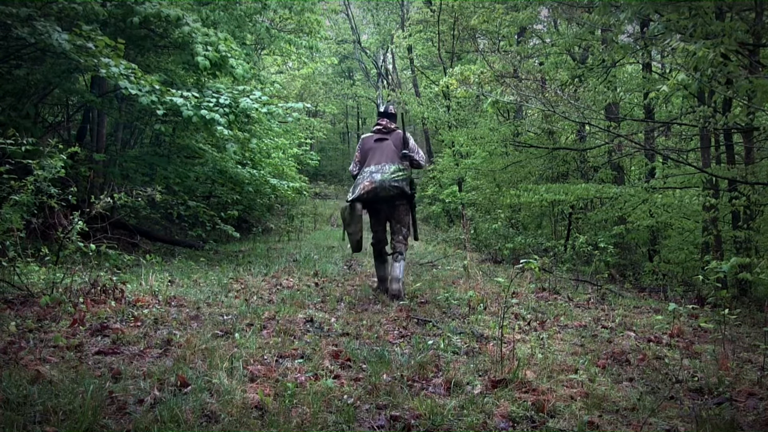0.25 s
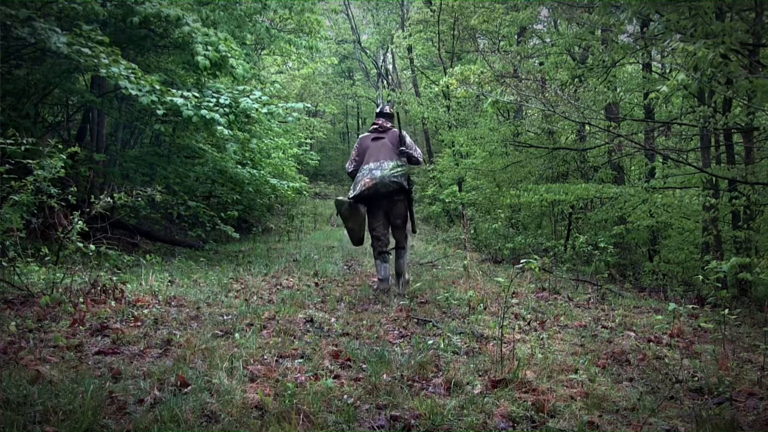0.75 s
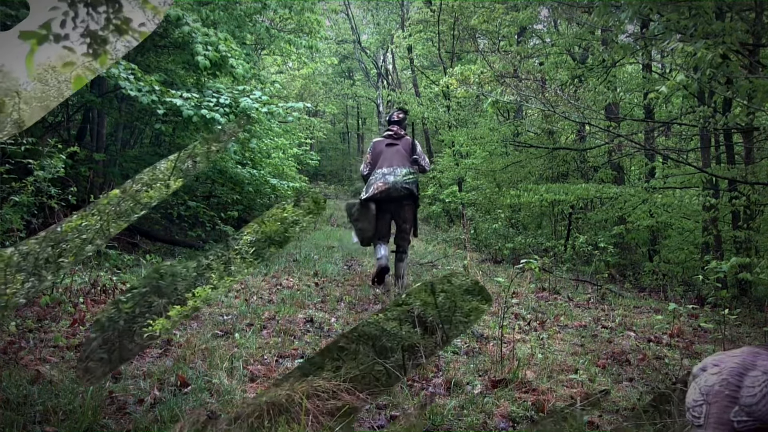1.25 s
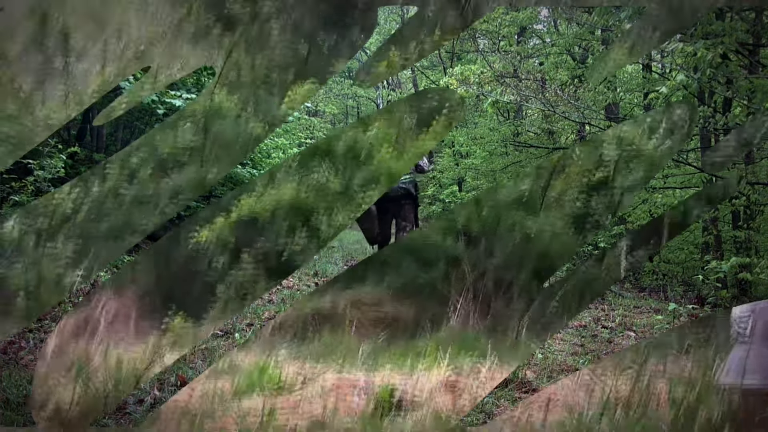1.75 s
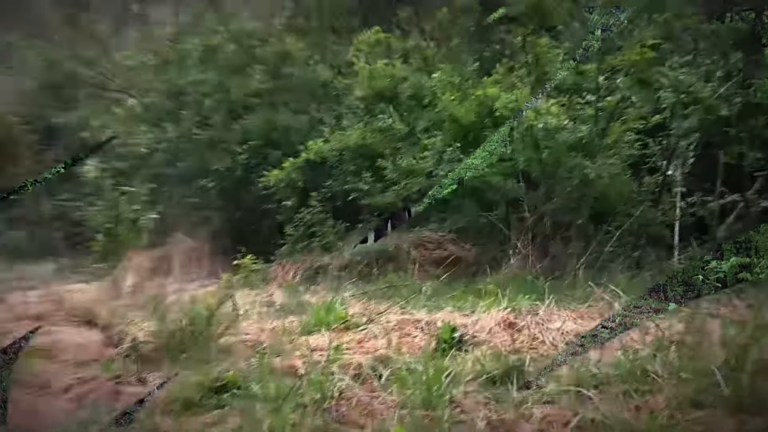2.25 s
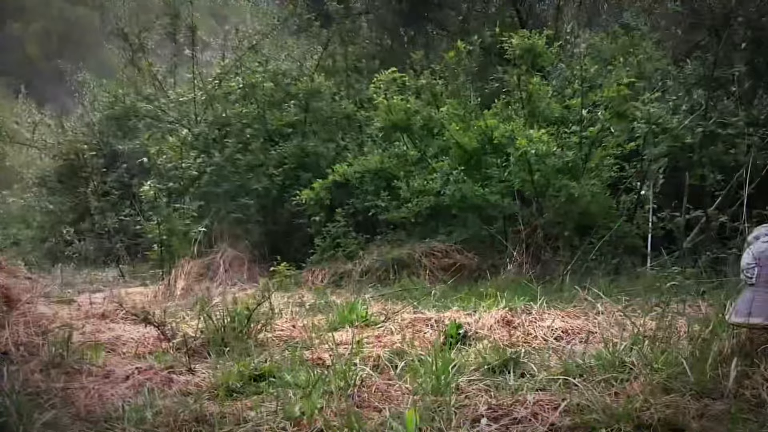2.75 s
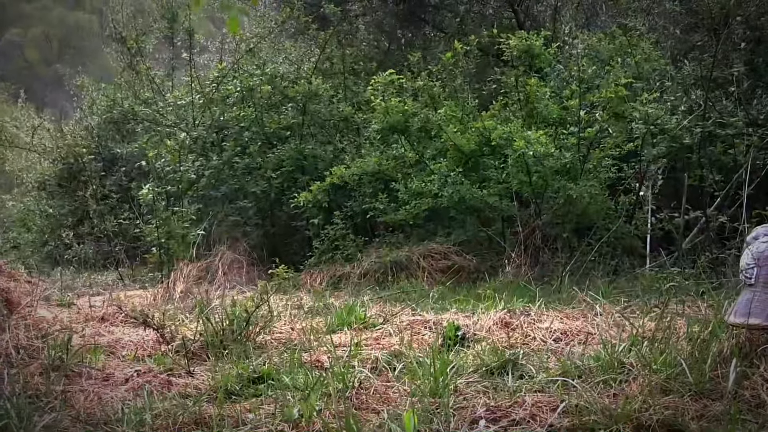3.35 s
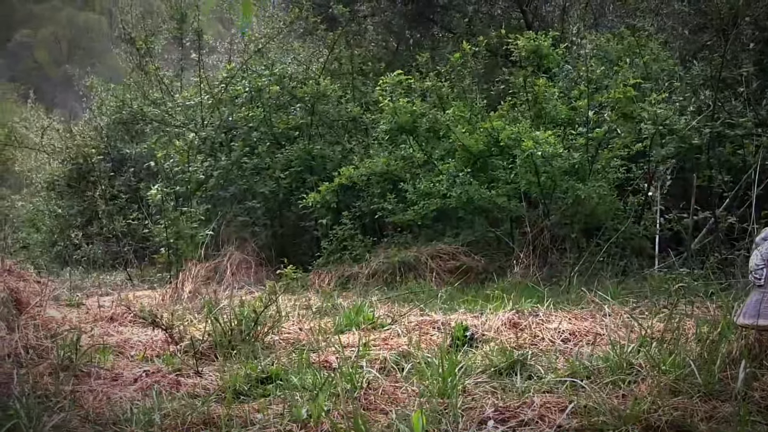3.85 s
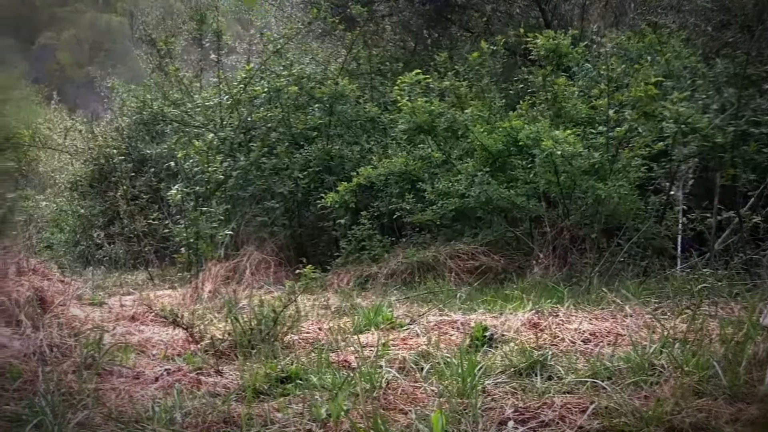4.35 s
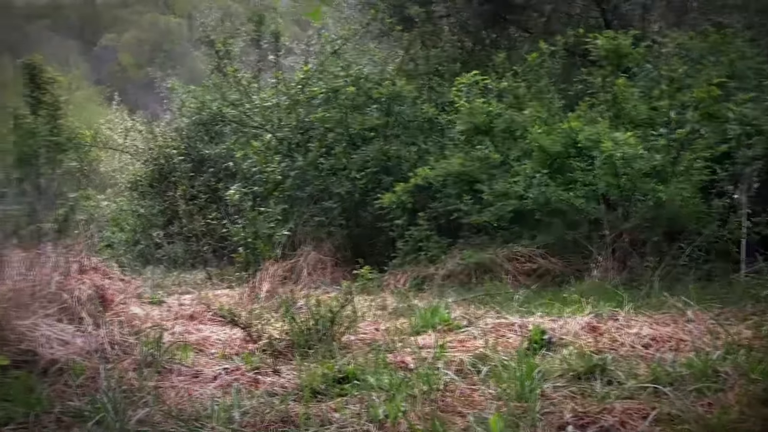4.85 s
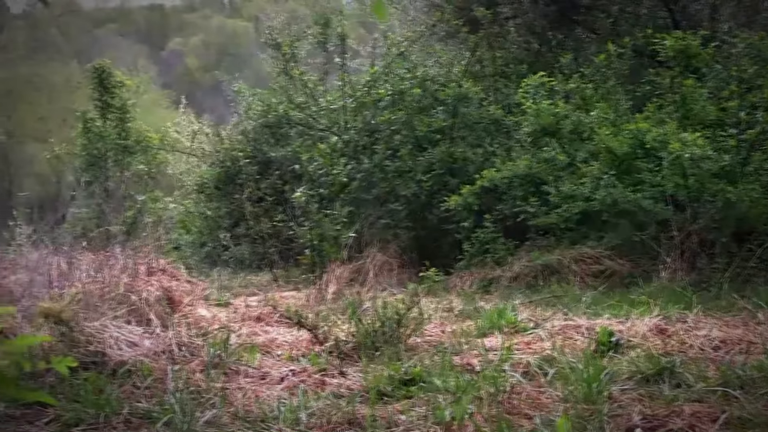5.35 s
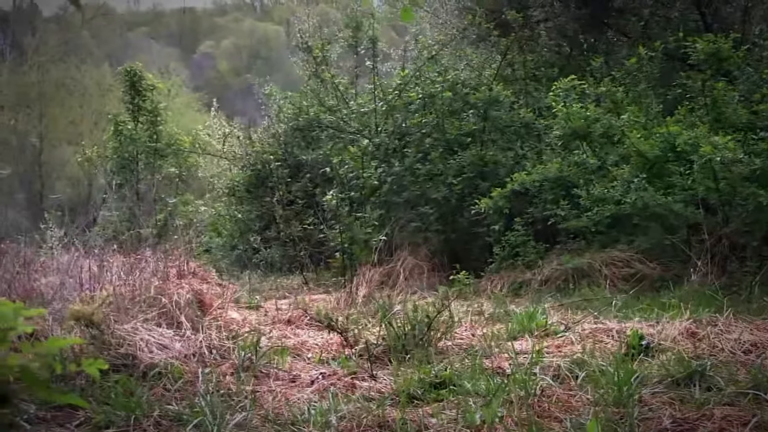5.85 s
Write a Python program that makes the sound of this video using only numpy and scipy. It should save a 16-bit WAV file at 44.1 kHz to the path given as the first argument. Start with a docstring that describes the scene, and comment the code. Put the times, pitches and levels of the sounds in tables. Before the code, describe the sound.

Faint songbirds and a few soft steps in a wood, then a distant turkey yelps and a close one calls loudly with raspy notes.

```python
"""Spring woodland, one microphone. Songbirds whistle among the trees; one trills, then a two-note song repeats.
A few soft knocks of steps and gear sound over the hush of the wood. Near three seconds a wild turkey hen
yelps softly from farther off. From 3.5 s another yelps close to the microphone, and the far one answers:
each full note leaps up, rings clear, then sags and breaks into a rasp as the two membranes of the syrinx
part in pitch and beat against each other."""
import sys
import numpy as np
from scipy import signal
from scipy.fft import rfft, irfft, next_fast_len
from scipy.io import wavfile
from scipy.ndimage import uniform_filter1d, map_coordinates

SR = 44100
rng = np.random.default_rng(int(sys.argv[2]) if len(sys.argv) > 2 else 0)


def to_wav(s):
    """Save 16-bit WAV."""
    ch = np.atleast_2d(s).T  # columns
    pcm = np.round(np.clip(ch, -1, 1) * 32767)  # PCM
    wavfile.write(sys.argv[1], SR, pcm.astype(np.int16))


N = 269010
TIME = np.arange(N) / SR

ONSET_RASP, ONSET_RASP_S, FULL_RASP = .72, .013, .82   # a note starts rough and breaks rougher still
SWELL_DB, SWELL_S, RASP_LOSS_DB, CLOSE_DB = 7.5, .021, 3, 2.5
EFFORT_PEAK_S, EFFORT_DB_PER_S = .072, 25   # her effort builds to a peak, then ebbs
THROB_HZ, THROB_PEAK_S = 16.25, .033
# the near hen's clear voice: harmonic number, level/dB
NEAR_HARMONICS = [(1, -40), (2, -19), (3, -12.5), (4, -0.5), (5, -23), (6, -14), (7, -24.5), (8, -26),
                  (9, -28.5), (10, -29.5), (11, -43.5), (13, -43.5), (16, -62)]
# her yelps: start t/s, end t/s, pitch f/Hz, leap f/Hz, sag f/Hz, bow of the sag (1 = straight),
# level/dB, throb/dB, early rasp (0-1), breaks after t/s, break takes t/s
NEAR_YELPS = [(3.511, 3.562, 853, 0, 22.3, 0.88, -16.5, 0, 0.66, 0, 0.04),
              (3.802, 4.069, 937.8, 199.5, 104.1, 1.1, -16.5, 0, 0.14, 0.096, 0.17),
              (5.408, 5.663, 942.7, 196.5, 88.16, 1.55, -13, 1, 0.033, 0.17, .035),
              (5.908, 6.179, 939.2, 204, 100, 0.88, -14, 1.9, 0.0028, 0.17, 0.081)]


def near_hen():
    """Close to the microphone: loud yelps that swell, throb and break, with a faint tail from the wood."""
    dry = np.zeros(N)
    for start, end, hz, leap_hz, sag_hz, bow, db, throb_db, early_rasp, break_at, break_s in NEAR_YELPS:
        length = end - start
        age = ages(length + .043)
        pitch, closing = yelp_pitch(age, length, hz, leap_hz, sag_hz, bow, leap_s=.0105)
        broken = np.clip((age - break_at) / break_s, 0, 1)
        onset_rasp = ONSET_RASP * np.exp(-(age / ONSET_RASP_S) ** 2)
        rasp = np.maximum(early_rasp + (FULL_RASP - early_rasp) * broken, onset_rasp)
        ebb = EFFORT_DB_PER_S * np.abs(age - EFFORT_PEAK_S)
        soft_start = SWELL_DB * np.exp(-age / SWELL_S) * (1 - early_rasp)   # a rough note starts louder
        throb = throb_db * np.cos(2 * np.pi * THROB_HZ * (age - THROB_PEAK_S))
        level_db = db - ebb - soft_start + throb - RASP_LOSS_DB * broken - CLOSE_DB * closing ** 2
        note = yelp(pitch, level_db, rasp, length, NEAR_HARMONICS,
                    jitter=.018, beat_depth=.27, second_db=-22.5, shimmer_db=3.6)
        dry += placed(note, start)
    dry = band(dry, 470, 13400)
    return dry + from_db(-15) * trees(dry, t60=.58, top_hz=6600, first_s=.002)


def yelp_pitch(age, length, hz, leap_hz, sag_hz, bow, leap_s, close_s=.01757, drop_hz=52.6):
    """Pitch leaps up, sags and drops at the close. Also gives how far the note has closed, 0-1."""
    leap = leap_hz * np.exp(-age / leap_s)
    sag = sag_hz * (age / length) ** bow
    closing = np.exp(np.minimum(age - length, 0) / close_s)
    return hz - leap - sag - drop_hz * closing, closing


SECOND_MEMBRANE_HZ = 932   # holds its pitch while the first membrane sags
RASP_DULL_DB, HIGHEST_FIRM_HARMONIC = 1.7, 6   # rasp dissolves the harmonics above this one
# a hen's throat when the voice rasps: f/Hz, level/dB
THROAT = [(850, -32.5), (1300, -17.5), (1650, -7.5), (2100, -21.5), (2600, -10.5), (3400, 1), (4300, -3.5),
          (5100, -6), (6100, -11), (7000, -12.5), (9000, -25), (12000, -30.5), (15000, -37)]


def yelp(pitch, level_db, rasp, length, voice, jitter, beat_depth, second_db, shimmer_db, grit_db=-6):
    """One note: two membranes of the syrinx part in pitch and beat ever faster into a rasp."""
    size, rasp = len(pitch), np.clip(rasp, 0, 1)
    wobble = .0025 * drift(81, size) + jitter * rasp ** 2 * drift(900, size)
    phase = 2 * np.pi * np.cumsum(pitch * (1 + wobble)) / SR
    second_phase = 2 * np.pi * np.cumsum(SECOND_MEMBRANE_HZ * (1 + .014 * drift(137.2, size))) / SR
    beat = second_phase - phase
    tone = from_db(second_db) * rasp * (np.sin(second_phase) + np.sin(2 * second_phase))
    for k in range(1, 17):
        # rasping shifts energy from the fourth harmonic into the broad throat resonance
        strength = (1 - rasp) * from_db(along(voice, k)) + rasp * at_hz(THROAT, k * pitch)
        shimmer = from_db(shimmer_db * min(k / 5, 1.5) * drift(57.5, size))
        dull = from_db(-RASP_DULL_DB * np.sqrt(rasp) * max(k - HIGHEST_FIRM_HARMONIC, 0))
        tone += dull * strength * shimmer * np.sin(k * phase + .385 * k * k)
        for step in (-2, -1, 1, 2, 3):   # the beat hangs side tones on each harmonic, mostly above it
            side_hz = k * pitch + step * (SECOND_MEMBRANE_HZ - pitch)
            side = beat_depth * rasp ** .59 * at_hz(THROAT, side_hz) * min(k / 4, 1)
            side *= dull * (1 if step > 0 else .45)
            tone += side * np.sin(k * phase + step * beat + rng.uniform(0, 2 * np.pi))
    tone /= np.sqrt(uniform_filter1d(tone ** 2, size=900) + 1e-9)   # even out the level
    pulsed_noise = rng.standard_normal(size) * (1 + np.cos(phase)) * (1 + .49 * np.cos(2 * beat))
    grit = coloured(pulsed_noise, THROAT)
    share = from_db(grit_db) * (rasp + .03)
    envelope = from_db(level_db) * gate(np.arange(size) / SR, length, rise_s=.00089, fall_s=.0076)
    return envelope * (tone + share * grit) / np.sqrt(1 + share ** 2)


FAR_SWELL_DB_PER_HZ, FAR_FADE_DB = .18, 8   # a wider leap starts softer; each note fades as it goes
# the far hen's clear voice: harmonic number, level/dB
FAR_HARMONICS = [(1, -13), (2, -2), (3, 1.5), (4, 16.5), (5, -41.5), (6, 1), (7, -13.5), (9, -17),
                 (11, -38), (16, -67)]
# colour lent by ground and foliage on the way to the microphone: f/Hz, gain/dB
FOLIAGE_PATH = [(700, -34), (1700, 10), (2600, 8), (3500, -2.5), (4400, -8), (5200, -4), (8000, 3),
                (14000, -10)]
# her yelps: start t/s, end t/s, pitch f/Hz, leap f/Hz, sag f/Hz, level/dB before the path,
# rasp (0-1), extra ring of the fourth harmonic/dB
FAR_YELPS = [(2.851, 2.963, 929, 68, 21.9, -45.5, 0.08, -15),
             (3.097, 3.514, 891.6, 141, 95, -38, 0.43, 3.5), (4.059, 4.158, 807, -1, 35, -36.5, 0.53, 1.5),
             (4.163, 4.332, 792, 30.5, 58, -37.5, 0.67, -0.5),
             (5.761, 6.023, 840, 16.5, 32.6, -36.5, 0.15, 6.5)]


def far_hen():
    """Farther off in the wood: soft yelps, coloured and smeared by the trees."""
    dry = np.zeros(N)
    for start, end, hz, leap_hz, sag_hz, db, rasp, ring_db in FAR_YELPS:
        length = end - start
        age = ages(length + .03)
        pitch, _ = yelp_pitch(age, length, hz, leap_hz, sag_hz, bow=1.1, leap_s=.02)
        soft_start = FAR_SWELL_DB_PER_HZ * leap_hz * np.exp(-age / .025)
        level_db = db - soft_start - FAR_FADE_DB * age / length
        voice = [(k, harmonic_db + ring_db * (k == 4)) for k, harmonic_db in FAR_HARMONICS]
        note = yelp(pitch, level_db, rasp, length, voice,
                    jitter=.011, beat_depth=1, second_db=-14, shimmer_db=3.5)
        dry += placed(note, start)
    size = next_fast_len(N)
    path = at_hz(FOLIAGE_PATH, np.arange(size // 2 + 1) * SR / size)
    arriving = irfft(rfft(dry, size) * path, size)[:N]
    return from_db(-2) * arriving + from_db(-1) * trees(arriving, t60=1, top_hz=6100, first_s=.004)


TRILL_START_S, TRILL_STEP_S, TRILL_SLOWING_S = .573, .0719, .00013
TRILL_DB, TRILL_PEAK_S, TRILL_FADE_DB_PER_S2 = -29.7, .78, 50
ARCH_S, ARCH_FOOT_HZ, ARCH_TOP_HZ, ARCH_FOOT_DB = .0165, 3120, 5674, -11
SWEEP_AFTER_S, SWEEP_S, SWEEP_FROM_HZ, SWEEP_TO_HZ = .023, .045, 5400, 8000
SWEEP_DB, SWEEP_FADE_DB = -4, 29


def trill(count=9):
    """A songbird in the trees repeats a quick arch and a fading upsweep, slowing slightly."""
    height = np.sin(np.pi * (ages(ARCH_S) / ARCH_S) ** 1.5) ** .68
    arch_hz = ARCH_FOOT_HZ + (ARCH_TOP_HZ - ARCH_FOOT_HZ) * height
    arch_gain = from_db(ARCH_FOOT_DB * (1 - height)) * signal.windows.tukey(len(height), .15)
    progress = ages(SWEEP_S) / SWEEP_S
    sweep_hz = SWEEP_FROM_HZ + (SWEEP_TO_HZ - SWEEP_FROM_HZ) * progress ** .5
    sweep_gain = from_db(SWEEP_DB - SWEEP_FADE_DB * progress) * np.minimum(20 * progress, 1)
    dry = np.zeros(N)
    for k in range(count):
        start = TRILL_START_S + k * TRILL_STEP_S + k * k * TRILL_SLOWING_S
        tuning = rng.normal(1, .0075)
        arch = placed(arch_gain * sine(tuning * arch_hz), start)
        sweep = placed(sweep_gain * sine(tuning * sweep_hz), start + SWEEP_AFTER_S)
        dry += from_db(TRILL_DB - TRILL_FADE_DB_PER_S2 * (start - TRILL_PEAK_S) ** 2) * (arch + sweep)
    return dry + from_db(-3.5) * trees(dry, t60=.56, top_hz=8000, first_s=.002)


# held whistles: start t/s, length t/s, f/Hz, level/dB
HELD_NOTES = [(-.05, 0.117, 2605, -36), (.112, 0.21, 6540, -54), (.215, 0.23, 2540, -39),
              (0.393, 0.24, 3745, -42.5), (2.453, 0.09, 3340, -52), (2.919, 0.067, 2644, -48),
              (3.773, 0.074, 3350, -35)]
# the long note of a two-note song: start t/s, length t/s, f/Hz, level/dB
SONG_NOTES = [(1.519, .11, 2710, -36.5), (1.74, .13, 2656, -32.5), (1.983, .135, 2655, -32)]
# falling slurs: start t/s, length t/s, first f/Hz, level/dB, share scattered by the trees (0-1)
FALLING_SLURS = [(0.786, 0.12, 3120, -41, 0.78), (1.13, 0.14, 3073, -42, 0.75),
                 (2.829, 0.071, 3130, -47.5, 0.4), (4.306, 0.032, 3760, -40.5, 0.4),
                 (4.596, 0.024, 3795, -40, 0.7), (4.859, .1, 3210, -47.5, .55),
                 (4.964, .04, 3220, -42, 0.9), (5.307, 0.057, 3120, -45, 0.8)]
# rising slurs: start t/s, length t/s, first f/Hz, level/dB
RISING_SLURS = [(0.174, 0.096, 1825, -44), (2.349, 0.11, 2770, -52.5), (2.986, .095, 2610, -48),
                (3.658, 0.065, 2780, -42), (4.481, 0.065, 2570, -45.5), (4.896, 0.021, 5500, -49)]


def songbirds():
    """Gliding whistles from around the wood; the farther the bird, the more the trees scatter it."""
    song = np.zeros((2, N))
    for start, length, hz, db in HELD_NOTES:
        song += whistle(start, length, hz, hz * (1 - .01523), db, bow=.81, wet=.6)
    for start, length, hz, db in SONG_NOTES:
        song += whistle(start, length, hz, hz * (1 - .036), db, bow=.446, wet=.33)
        flick_at = start + length + .027   # the second note is an upward flick
        song += whistle(flick_at, length=.024, from_hz=2330, to_hz=2753, db=db - 5, bow=.45, wet=.51)
    for start, length, hz, db, wet in FALLING_SLURS:
        song += whistle(start, length, hz, hz * .72, db, bow=3.1, wet=wet)
    for start, length, hz, db in RISING_SLURS:
        song += whistle(start, length, hz, hz * 1.4, db, bow=.77, wet=.62)
    for start in 3.58 + .2815 * np.arange(5):   # a nearer bird repeats one low falling chirp
        song += whistle(start, length=.064, from_hz=2490, to_hz=1856, db=-43, bow=2.3, wet=.18)
    direct, scattered = song
    return direct + trees(scattered, t60=.91, top_hz=5960, first_s=.0029)


def whistle(start, length, from_hz, to_hz, db, bow, wet):
    """A pure note, as a direct part and a part to scatter; a bow under 1 glides early, over 1 late."""
    progress = ages(length) / length
    hz = (from_hz + (to_hz - from_hz) * progress ** bow) * (1 + .0048 * drift(87, len(progress)))
    swell = np.sqrt(np.minimum(2 * progress, 1)) * np.minimum(10 * (1 - progress), 1)   # quick stop
    note = from_db(db + 1.3 * drift(71, len(progress))) * swell * sine(hz)
    return np.outer([np.sqrt(1 - wet ** 2), wet], placed(note, start))


# soft knocks: t/s, level/dB, ring f/Hz, ring's 60 dB decay t/s, relative crack level/dB
STEPS_AND_GEAR = [(1.662, -42, 1780, .021, -2), (1.912, -33, 550, .072, -14), (2.145, -27, 695, .042, -24),
                  (2.257, -28.5, 1100, .016, -24), (2.721, -30.5, 200, .05, -14),
                  (2.737, -27.5, 1064, .022, -5), (3.094, -33, 1100, .03, -14)]


def knocks():
    """Steps and gear: each a damped ring with a longer, dull thud under it and a brief crack on top."""
    out = np.zeros(N)
    for start, db, hz, t60, crack_db in STEPS_AND_GEAR:
        at = span(start, start + .2)
        t = np.arange(len(at)) / SR
        thud_noise, crack_noise = rng.standard_normal((2, len(at)))
        ring = .47 * np.sin(2 * np.pi * hz * t) * from_db(-60 * t / t60)
        thud = .35 * rms_one(band(thud_noise, hz / 5, hz * 1.63)) * from_db(-30 * t / t60)
        crack = from_db(crack_db - 3.5 - 60 * t / .016) * rms_one(band(crack_noise, 1150, 5100, order=1))
        out[at] += from_db(db) * (ring + thud + crack)
    return band(out, 117, 15000, order=3)


def buzz():
    """The buzzy close of a distant bird's song dies away in the first moments."""
    return from_db(-46.5 - 89 * TIME) * rms_one(band(rng.standard_normal(N), 3770, 4310))


# dry leaves stirring: start t/s, length t/s, level/dB
LEAF_STIRS = [(2.301, 0.055, -58), (3.2, 0.024, -55), (4.642, 0.063, -50)]


def rustles():
    """Dry leaves give short clumps of tiny snaps."""
    out = np.zeros(N)
    for start, length, db in LEAF_STIRS:
        at = span(start, start + length)
        snaps = rng.standard_normal(len(at)) * from_db(4.7 * drift(403, len(at)))
        out[at] += from_db(db) * rms_one(band(snaps, 1500, 3900, order=1) * np.hanning(len(at)))
    return out


# colour of the wood's background: f/Hz, spectral level/dB
WOOD_SPECTRUM = [(18, -55), (30, -37), (133, -7.5), (164, -3), (237, -4.5), (420, -1), (575, -1), (945, -2),
                 (1140, -5.5), (2420, -6.5), (2620, 0.5), (3150, -6.5), (4310, -16), (7260, -26.5),
                 (15500, -35.5)]
# hush of moving air: t/s, level/dB
HUSH_CURVE = [(0, -54), (1.2, -54.5), (1.7, -52.5), (2.4, -52.5), (3.0, -52.5), (3.7, -50), (4.6, -48.5),
              (6.1, -50.5)]
# hiss of leaves and air: t/s, level/dB
HISS_CURVE = [(0, -59.5), (2.22, -58), (2.28, -62.5), (2.7, -60), (3.2, -58), (4.5, -55.5), (6.1, -56)]
# blur of distant song: t/s, level/dB
CHORUS_CURVE = [(0, -61.5), (1.4, -58), (2.2, -62.5), (2.5, -57.5), (3.5, -49), (4.6, -56), (5.2, -56.5),
                (6.1, -46.5)]


def woodland():
    """All around the microphone: rumble and hush of moving air, thin leaf hiss and distant song."""
    rumble = from_db(-64 + drift(33, N)) * rms_one(band(rng.standard_normal(N), 99, 264))
    hush = np.zeros(N)
    for hz in np.geomspace(130, 1900, 9):   # each band wavers on its own
        noise = band(rng.standard_normal(N), hz / 1.168, hz * 1.2)
        hush += noise * at_hz(WOOD_SPECTRUM, hz) * from_db(1.85 * drift(21, N))
    hush = rms_one(hush) * from_db(along(HUSH_CURVE, TIME))
    air = coloured(rng.standard_normal(next_fast_len(N)), WOOD_SPECTRUM)[:N]
    hiss = rms_one(band(air, 5120, 18700, order=3)) * from_db(along(HISS_CURVE, TIME) + .5 * drift(33, N))
    chorus = np.zeros(N)
    for hz in np.geomspace(2100, 4000, 8):   # the distant voices come and go
        noise = band(rng.standard_normal(N), hz * .95, hz * 1.05)
        chorus += noise * at_hz(WOOD_SPECTRUM, hz) * from_db(4.5 * drift(25, N))
    return rumble + hush + hiss + rms_one(chorus) * from_db(along(CHORUS_CURVE, TIME))


def trees(x, t60, top_hz, first_s):
    """Trunks and leaves throw back a thickening swarm of small, duller echoes."""
    t = ages(1)
    swarm = rng.standard_normal(SR) * (rng.random(SR) < .02 + t) * (t > first_s)
    decay = from_db(-60 * t / t60) / np.sqrt(.0042 + t)
    echoes = band(swarm * decay, 280, top_hz, order=1)
    return signal.fftconvolve(x, echoes / np.sqrt(np.sum(echoes ** 2) * SR / 2 / top_hz))[:N]


def from_db(db):
    """Decibels to gain."""
    return 10 ** (np.asarray(db) / 20)


def rms_one(x):
    """Scale to unit rms."""
    return x / np.sqrt(np.mean(x ** 2) + 1e-20)


def along(curve, x):
    """A two-column curve, read at x."""
    return np.interp(x, *np.transpose(curve))


def at_hz(spectrum, hz):
    """Gain of a spectrum at the given frequencies."""
    f, db = np.transpose(spectrum)
    return from_db(np.interp(np.log(hz + 1), np.log(f), db))


def coloured(x, spectrum):
    """Pass a sound through a spectrum; rms 1."""
    hz = np.arange(len(x) // 2 + 1) * SR / len(x)
    return rms_one(irfft(rfft(x) * at_hz(spectrum, hz), len(x)))


def band(x, low_hz, high_hz, order=2):
    """Band-pass."""
    return signal.sosfilt(signal.butter(order, [low_hz, high_hz], "band", fs=SR, output="sos"), x)


def drift(rate, size):
    """Smooth chance with about `rate` turns a second; spread about 1."""
    knots = rng.standard_normal(int(size * rate / SR) + 4)
    return map_coordinates(knots, [1 + np.arange(size) * rate / SR], order=3, mode="nearest")


def gate(age, length, rise_s, fall_s):
    """Opens, holds for the length, then dies away."""
    return np.clip(age / rise_s, 0, 1) * np.exp(-np.maximum(age - length, 0) / fall_s)


def span(start, end):
    """Sample numbers between two times."""
    return np.arange(max(int(start * SR), 0), min(int(end * SR), N))


def ages(length):
    """Time since the start of a sound, sample by sample."""
    return np.arange(int(length * SR)) / SR


def placed(sound, start):
    """A short sound set at its time in silence."""
    at = span(start, start + len(sound) / SR)[:len(sound) - 1]
    out = np.zeros(N)
    out[at] = sound[at - int(start * SR)]
    return out


def sine(hz):
    """A pure tone along a pitch curve."""
    return np.sin(2 * np.pi * np.cumsum(hz) / SR)


def scene():
    """Hens, songbirds and the wood, all at one microphone."""
    birds = near_hen() + far_hen() + trill() + songbirds() + buzz()
    return (birds + knocks() + rustles() + woodland())[None]


def record(dry, cutoff_hz=15750):
    """The top is cut steeply."""
    return signal.sosfilt(signal.ellip(12, .1, 80, cutoff_hz, fs=SR, output="sos"), dry)


dry = scene()
out = record(dry)
to_wav(out)
```